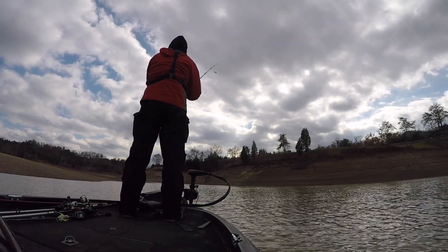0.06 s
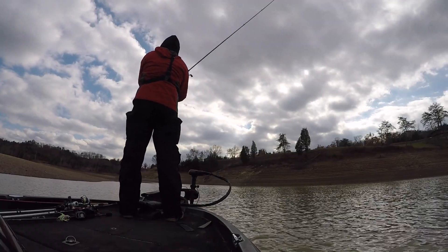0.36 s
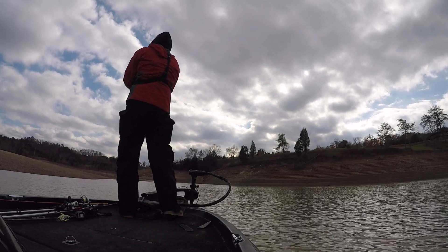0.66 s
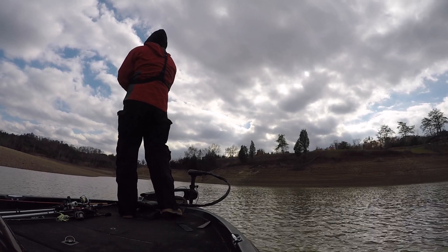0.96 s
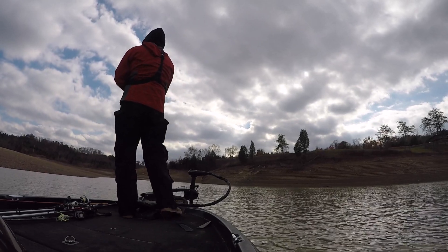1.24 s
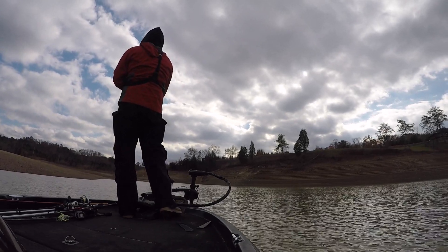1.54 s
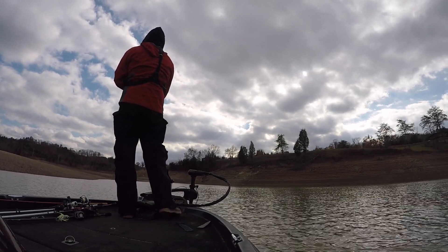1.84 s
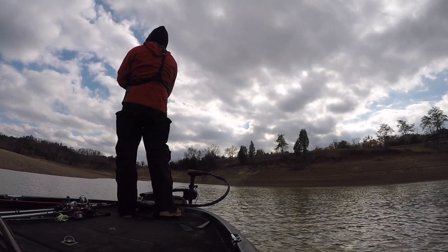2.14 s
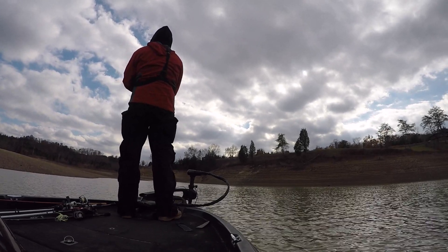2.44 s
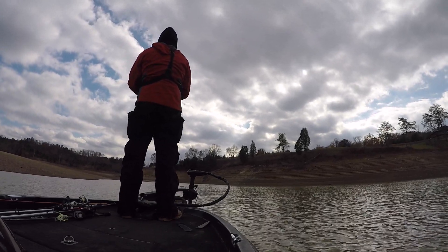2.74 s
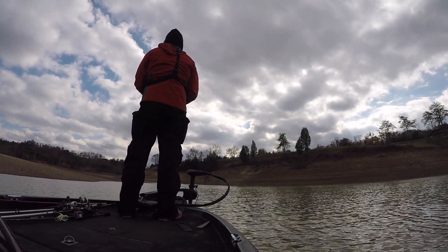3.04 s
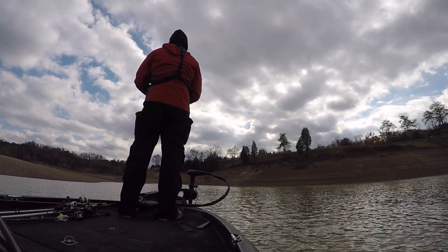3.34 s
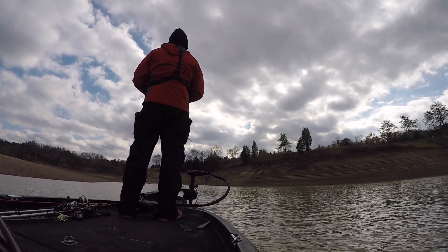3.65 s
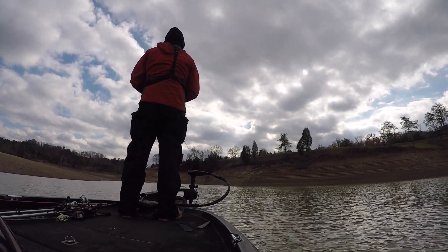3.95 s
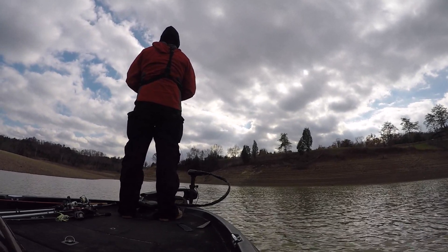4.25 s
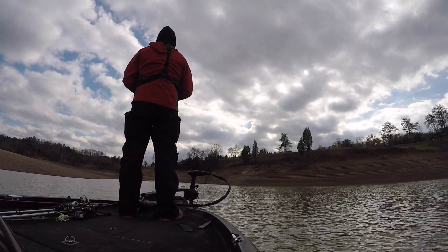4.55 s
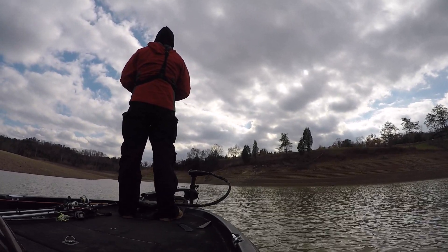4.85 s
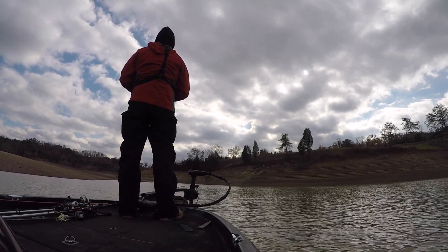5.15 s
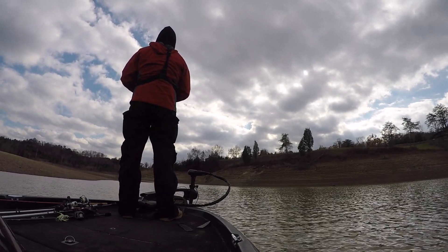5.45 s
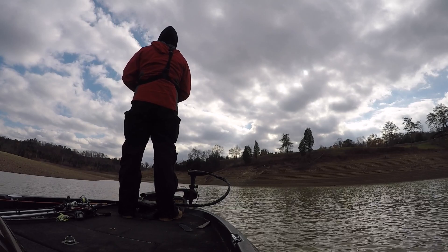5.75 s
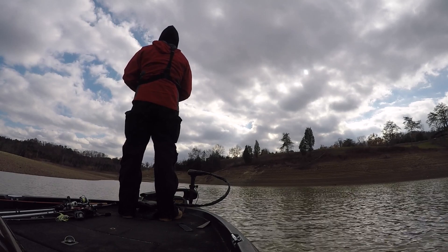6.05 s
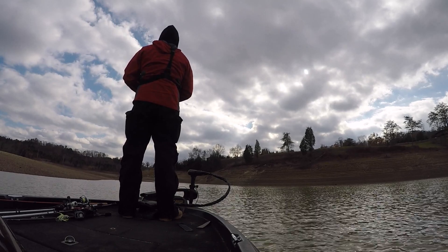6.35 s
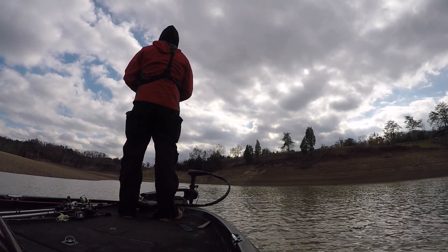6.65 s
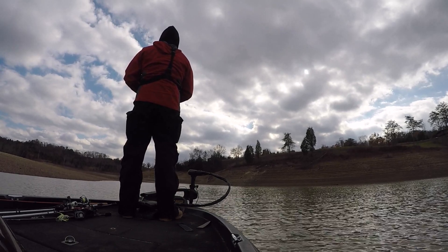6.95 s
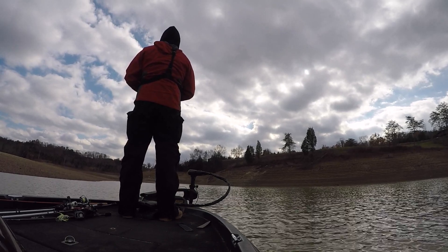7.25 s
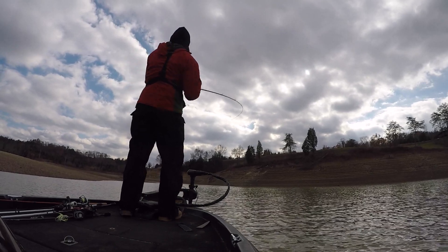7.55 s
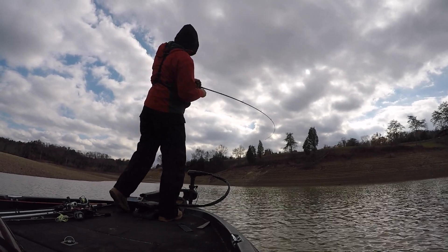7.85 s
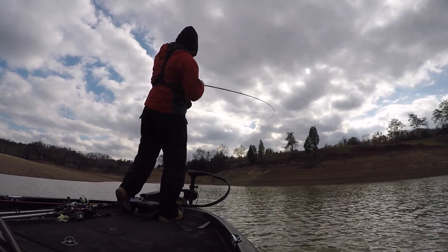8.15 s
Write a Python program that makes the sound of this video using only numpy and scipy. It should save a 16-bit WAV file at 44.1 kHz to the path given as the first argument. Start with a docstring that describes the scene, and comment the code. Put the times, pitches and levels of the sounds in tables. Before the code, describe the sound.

Small waves slosh and knock against a fishing boat creeping across a lake, over a low rumble and the hum of an electric trolling motor. A reel whirrs faintly in a cast, then tackle ticks now and then, once with a sharp click. The motor grows louder toward the end, when a jacket rustles, the rod clicks and a foot thuds. The microphone sits on deck and sounds close and boxy.

```python
"""Bass boat on a lake, from the deck.

The camera sits on deck in a waterproof case, two microphones behind its ports. The electric trolling
motor hums through the hull as the boat creeps along; ripples wash, gurgle and slap at the bow.
Close by, an angler casts: line sings in the guides, the spool whirrs, tackle ticks and rings.
Near the end his jacket swishes as he sweeps the rod back, and a foot thumps."""
import sys
import numpy as np
from scipy import signal
from scipy.fft import rfft, irfft, next_fast_len
from scipy.io import wavfile

SR = 44100
rng = np.random.default_rng(int(sys.argv[2]) if len(sys.argv) > 2 else 0)


def log_audio(samples):
    """Write samples as a 16-bit WAV file to the path given in sys.argv[1]."""
    # one column per channel
    frames = np.atleast_2d(samples).T
    # limit to full scale, then quantise
    limited = np.clip(frames, -1, 1)
    pcm = np.round(limited * 32767).astype(np.int16)
    wavfile.write(sys.argv[1], SR, pcm)


N = 370686
TIME = np.arange(N) / SR
FFT_SIZE = next_fast_len(N + SR // 10, True)
BINS = np.maximum(np.fft.rfftfreq(FFT_SIZE, 1 / SR), 1)

# Propeller speed. Each row: time in seconds, blade passes per second.
BLADE_RATE = [(0, 77.8), (1.4, 78.3), (2.3, 77.9), (3.2, 77.5), (4.8, 77.0), (6.5, 76.3), (7.3, 75.9),
              (7.7, 75.6), (8.41, 75.9)]
# Thrust through the hull, and the propeller's higher purr. Each row: time in seconds, level in dB.
THRUST_LEVEL = [(0, -56), (0.6, -58), (1.2, -52), (1.42, -41), (1.8, -43), (2.25, -38.5), (2.9, -45),
                (3.6, -52), (4.3, -55.5), (4.8, -49), (5.5, -48.5), (6.9, -45), (7.3, -48), (7.6, -37.5),
                (8.41, -36)]
PURR_LEVEL = [(0, -56), (1.2, -55), (2.5, -53), (3.3, -50.5), (4.8, -48), (6.0, -48), (7.0, -48.5),
              (7.5, -54), (8.41, -55)]
# Their partials. Each row: multiple of the blade rate, gain in dB, share of the level's swing.
THRUST_ORDERS = [(1, -15.5, 0.26), (2, -8.5, 0.6), (3, -1, 0.95)]
PURR_ORDERS = [(4, -3.5, 0.1), (5, -1, 0.5), (6, -0.5, 1), (7, -10, 0.5), (9, -9, 0.8)]
# The deck droning under the camera. Each row: time in seconds, pitch in Hz, level in dB.
DECK_DRONE = [(0, 103.5, -52.5), (2, 103.5, -58), (3.8, 103.8, -59.5), (4.6, 104.1, -57.5),
              (5.5, 103.7, -48), (6.0, 103.4, -42), (6.8, 103.1, -43.5), (7.35, 104, -47),
              (7.7, 103.7, -41), (8.41, 103.4, -41.5)]
# Its partials. Each row: multiple of half that pitch, gain in dB, share of the level's swing.
DRONE_ORDERS = [(1.13, -16.5, 0.61), (2.003, -1.5, 0.92), (2.78, -12, 0.9), (3, -3.5, 0.88)]
# Propeller churn and hull rumble. Each row: frequency in Hz, relative level in dB.
CHURN_SPECTRUM = [(50, -35), (100, -2), (160, 3.5), (205, 2.5), (258, -3), (335, 2.5), (480, -7),
                  (800, -56)]
RUMBLE_SPECTRUM = [(20, -21), (35, -6), (55, 2), (90, 6.5), (160, 8.5), (215, 4.5), (258, 2), (335, 1),
                   (480, 0), (800, -82)]
# Hull rumble, and ripples along the bow. Each row: time in seconds, level in dB.
RUMBLE_LEVEL = [(0, -33.5), (0.2, -40.5), (0.52, -47), (0.72, -37.5), (1.2, -39.5), (2.05, -44.5),
                (2.55, -39), (3.05, -44.5), (4.7, -44), (5.6, -42.5), (5.9, -40), (6.6, -37.5),
                (7.25, -40.5), (7.65, -35), (8.41, -43.5)]
RIPPLE_LEVEL = [(0, -42.5), (0.55, -49.5), (1.2, -41), (2.45, -41), (3.1, -38.5), (4.0, -38.5),
                (4.6, -39.5), (5.35, -45), (6.1, -40.5), (7.1, -41.5), (8.41, -48.5)]
# Larger waves. Each row: crest and length in seconds, then wash, gurgle and splash levels in dB.
WAVES = [(0.01, 0.068, -27.5, -41.5, -55.5), (0.157, 0.13, -32.5, -33.5, -57.5),
         (0.296, 0.094, -34, -48.5, -62), (0.99, 0.55, -51, -50.5, -64.5), (1.334, 0.085, -41, -41, -60),
         (1.525, 0.21, -36.5, -54.5, -65), (1.885, 0.12, -35.5, -61, -70), (2.147, 0.21, -34.5, -48, -72),
         (2.487, 0.27, -53.5, -51.5, -63.5), (2.908, 0.17, -40, -60, -63), (3.614, 0.16, -34, -57, -82),
         (3.773, 0.14, -36, -40.5, -85), (4.816, 0.46, -40.5, -55, -70.5), (5.067, 0.2, -52.5, -63, -72),
         (5.797, 0.1, -47, -50.5, -80), (6.427, 0.24, -41, -52, -64.5), (6.836, 0.32, -39.5, -52, -67.5),
         (7.237, 0.29, -43, -49, -75), (7.685, 0.21, -35, -47.5, -56.5), (7.966, 0.77, -45.5, -55, -63.5)]
# Air between bow and water rings higher as it closes. Each row: time in seconds, pitch in Hz.
POCKET_PITCH = [(0.0, 584), (0.3, 596), (0.44, 491), (2.15, 572), (2.25, 484), (3.3, 563), (4.14, 531),
                (5.22, 562), (5.27, 491), (5.85, 549), (6.09, 479), (6.51, 568), (6.76, 492), (7.21, 543),
                (7.33, 635), (7.4, 509), (7.82, 599), (8.41, 469)]
# Hull and case resonances stirred by water. Each row: frequency in Hz, width in Hz, gain in dB.
WASH_MODES = [(405, 62, -3.5), (482.4, 61, -2), (570.4, 33.6, 1), (659.5, 100, -1), (700.4, 30, -3)]
GURGLE_MODES = [(795, 199, 5), (995, 77, 7), (1040, 150, -0.5)]
SPLASH_MODES = [(1166, 140, 6), (1503, 190, 3), (1650, 93, 5.5), (1796, 380, -4)]
# Wavelets slapping the hull, and one low foot thump near the end. Each row: start in seconds,
# relative peak in dB, pitch in Hz, t60 in seconds, rise in seconds, fall as a share of the pitch.
HULL_BLOWS = [(0.0005, -15, 600, 0.025, 0.002, 0.12), (0.021, -21, 575, 0.029, 0.003, 0.082),
              (0.034, -21, 598, 0.05, 0.002, 0.14), (0.056, -21.5, 622, 0.04, 0.0018, 0.069),
              (0.072, -28, 970, 0.03, 0.0013, 0), (0.105, -26, 1005, 0.039, 0.002, 0),
              (0.137, -21.5, 658, 0.086, .006, 0), (0.183, -27, 918, 0.028, 0.0037, 0),
              (0.205, -27, 856, 0.05, 0.0024, 0), (0.286, -28, 671, 0.13, .0015, 0),
              (0.324, -26.5, 670, 0.035, 0.0012, 0.097), (1.038, -23, 878, 0.033, 0.002, 0.0047),
              (1.412, -23.5, 573, 0.091, 0.0012, 0.021), (1.468, -21, 602, 0.017, .0015, 0),
              (1.523, -27, 535, 0.059, 0.0024, 0), (1.855, -22.5, 592, 0.22, .004, 0.061),
              (1.966, -22.5, 610, 0.036, 0.0016, 0), (2.044, -25, 646, 0.059, 0.0022, 0.17),
              (2.104, -28, 607, 0.034, 0.0023, 0.47), (2.152, -18.5, 700, 0.017, 0.0024, 0.039),
              (2.208, -26.5, 510, 0.016, 0.0017, 0.35), (2.817, -26, 563, 0.091, 0.0022, 0.055),
              (2.898, -24.5, 582, 0.069, 0.003, 0.1), (3.016, -30.5, 556, 0.03, 0.0015, 0.12),
              (3.076, -27, 571, 0.041, 0.0016, 0.23), (3.141, -28.5, 555, 0.043, 0.0014, 0.16),
              (3.584, -23, 580, 0.08, .007, .05), (3.632, -20.5, 579, 0.087, 0.0011, 0.1),
              (3.689, -21, 592, 0.09, 0.003, 0.039), (3.709, -20.5, 628, 0.02, 0.002, 0.048),
              (4.53, -26, 564, 0.065, 0.0036, 0.12), (5.158, -23.5, 672, 0.019, 0.0013, 0),
              (5.460, -22.5, 885, 0.033, 0.0036, 0.18), (5.476, -36, 915, 0.051, 0.004, 0),
              (5.511, -18.5, 554, 0.029, 0.003, 0.54), (5.520, -21.5, 434, 0.015, 0.0046, 0),
              (5.885, -24.5, 783, 0.03, 0.0012, 0.0022), (6.351, -22, 565, 0.14, 0.0065, 0),
              (7.176, -32.5, 618, 0.02, 0.0016, 0.18), (7.293, -12.5, 618, 0.015, 0.0052, 0.22),
              (7.757, -11, 607.5, 0.068, 0.0026, 0.05), (7.861, -22, 674, 0.07, 0.0048, 0),
              (7.868, -23.5, 325, 0.022, .004, 0.041)]
# The first wave arrives from the right. Each row: time in seconds, left channel gain in dB.
BOW_LEFT_GAIN = [(0, -11), (0.33, -6.5), (0.5, -1)]
# Microphone hiss. Each row: time in seconds, level in dB.
HISS_LEVEL = [(0, -73.5), (0.55, -76.5), (0.68, -70.5), (2.0, -76), (2.45, -73.5), (3.4, -76), (3.8, -78.5),
              (5.0, -77.5), (5.65, -73.5), (5.95, -70.5), (6.45, -68), (7.0, -74), (7.4, -71),
              (7.65, -63.5), (8.41, -66.5)]
# Its colour, and the left side's further tilt. Each row: frequency in Hz, gain in dB.
HISS_SPECTRUM = [(800, -3), (2500, 0), (4200, -1.5), (6200, -1), (7400, 1), (8600, .5), (10000, -1.5),
                 (11200, -9), (12600, -9.5), (14000, -17)]
HISS_LEFT_TILT = [(2500, 5.5), (4500, -1.5), (6500, -5.5), (8000, -9), (13000, -21.5)]
# Line in the guides: cast, squeak, back sweep. Each row: time in seconds, pitch in Hz, level in dB.
CAST_LINE = [(0.6, 4930, -90), (0.635, 5400, -73), (0.675, 6200, -77), (0.71, 6750, -79), (0.76, 7000, -90)]
SQUEAK_LINE = [(3.173, 3540, -70), (3.178, 3270, -63), (3.186, 2790, -51), (3.195, 2670, -66),
               (3.23, 2660, -82)]
SWEEP_LINE = [(7.56, 5030, -75), (7.597, 5460, -59), (7.62, 5060, -57), (7.69, 4700, -69),
              (7.748, 6400, -54.5), (7.772, 4470, -65), (7.84, 3910, -73)]
# The spool spins up, then coasts. Each row: start of the hold and its length in seconds, level in dB.
SPOOL_SPIN = [(0.645, 0.033, -61.5)]
SPOOL_COAST = [(0.73, 0.42, -80.5)]
# Resonances of the spinning spool, coasting spool, sharp clicks and taut line in the guides.
# Each row: frequency in Hz, width in Hz, gain in dB.
SPIN_MODES = [(3170, 220, 3), (4500, 150, -3), (4780, 130, 3), (6300, 900, -13)]
COAST_MODES = [(3300, 700, -6), (4830, 300, -4)]
CLICK_MODES = [(1770, 490, 2), (3140, 350, 3.5), (3750, 510, 4), (5100, 930, -2.5), (6860, 140, 12),
               (9400, 390, -22), (12000, 1500, -17)]
RASP_MODES = [(3480, 210, -2), (3920, 250, -10), (4430, 210, -7.5), (6500, 870, -31)]
# Small tackle pinging, and hollow knocks about the boat. Each row: start in seconds,
# relative peak in dB, pitch in Hz, t60 in seconds, relative peak of the shared ring in dB.
PINGS = [(0.646, -56, 3230, 0.04, -85), (0.677, -59, 4580, 0.035, -85), (0.765, -51, 2400, 0.014, -78),
         (0.7955, -66, 10250, 0.035, -82), (1.697, -55.5, 2230, 0.026, -81),
         (2.143, -40.5, 2250, 0.011, -61), (2.167, -42, 4880, 0.014, -62), (2.905, -77, 3200, 0.029, -65),
         (3.726, -38, 3160, 0.012, -43), (4.818, -61, 2310, 0.065, -83), (5.161, -67, 4580, 0.037, -77),
         (5.868, -50.5, 2220, 0.049, -84), (7.022, -64, 5420, 0.038, -78), (7.863, -49, 2820, 0.063, -48),
         (7.863, -55.5, 10100, 0.045, -78), (7.864, -51, 6530, 0.071, -70), (7.967, -52, 3910, 0.081, -60)]
KNOCKS = [(1.039, -26.5, 1003, 0.036, -59), (1.304, -35, 1615, 0.032, -43), (1.342, -45, 1650, 0.035, -56),
          (1.3955, -29, 1375, 0.025, -36.5), (1.403, -33, 1454, 0.018, -36), (1.415, -39, 1410, 0.017, -51),
          (2.151, -32.5, 1207, 0.01, -44), (2.96, -49, 1450, 0.047, -60), (3.726, -35.5, 1120, 0.03, -34.5),
          (5.157, -41, 1396, 0.04, -44), (5.168, -45, 1470, 0.031, -47.5), (5.458, -37, 1175, 0.038, -59),
          (6.352, -22, 1265, 0.059, -35), (6.359, -29.5, 1192, 0.027, -39), (7.637, -46, 1430, 0.038, -56),
          (7.728, -47, 1305, 0.073, -41)]
# Sharp clicks: reel and rod snaps, and the bright edges of hull knocks.
# Each row: start in seconds, peak in dB, low and high edge in Hz, t60 in seconds.
CLICKS = [(0.764, -29, 1240, 2690, 0.0074), (1.398, -57, 1500, 2950, 0.005),
          (1.396, -58, 4500, 10000, .006), (1.698, -62, 1900, 3140, 0.011), (2.15, -48, 1590, 4600, 0.025),
          (2.1658, -39.5, 3070, 6050, 0.008), (2.173, -52, 4400, 5400, 0.0084),
          (3.7253, -20.5, 1600, 7990, 0.012), (7.523, -41, 1180, 1920, 0.012),
          (7.542, -47, 1210, 2180, 0.014), (7.632, -43, 1200, 5200, 0.03), (7.642, -39, 1200, 4400, 0.023),
          (7.664, -43, 1200, 4200, 0.025), (7.71, -31.5, 1000, 2270, 0.029), (7.731, -38, 1200, 2140, .025),
          (7.849, -47, 1000, 2700, 0.01), (7.86, -52, 2500, 10100, .03)]
# Trickles off the bow. Each row: middle and half length in seconds, pitch in Hz, level in dB.
TRICKLES = [(1.367, 0.048, 1740, -60), (2.996, 0.035, 1610, -65.5), (4.104, 0.043, 1620, -70.5),
            (4.38, 0.065, 1094, -60), (4.66, 0.046, 1650, -66.5), (4.86, 0.05, 1160, -56.5),
            (5.053, 0.04, 1180, -58), (5.08, 0.088, 1780, -69.5), (5.808, 0.073, 1290, -63),
            (6.857, 0.042, 1770, -64), (7.258, 0.06, 1750, -67)]
# The level dips briefly after two sharp slaps. Each row: start in seconds, nominal depth in dB.
DIPS = [(5.522, 10.5), (7.302, 9.5)]
# The jacket sweeps, the line comes taut. Each row: start and length of the hold in seconds, level in dB.
JACKET_STROKES = [(7.635, 0.13, -47.5)]
TAUT_STROKES = [(7.754, 0.02, -49.5)]
# Rubbing jacket cloth. Each row: frequency in Hz, relative level in dB.
CLOTH_SPECTRUM = [(1000, 15.5), (1700, 7), (2400, -0.5), (3100, -2.5), (3550, 3), (4300, -3), (5100, -6),
                  (5800, -24.5), (6700, -9), (8100, -38), (9200, -22.5), (13000, -45)]
# Balance of the case's two ports. Each row: frequency in Hz, left minus right in dB.
PORT_BALANCE = [(100, -5.5), (200, -6.5), (370, -10), (480, -13.5), (600, -18.5), (720, -14), (850, -5.5),
                (1200, -1), (2300, 0), (4200, .5), (7000, -1.5), (10000, -4)]
# Phase between the ports. Each row: frequency in Hz, lead of the left in radians.
PORT_PHASE = [(300, 0), (490, 2.4), (620, 0), (820, 1.94), (1500, 1.82), (2200, 1.85), (3000, 0.8),
              (5000, -1.5), (9000, -1.2)]


def from_db(db):
    """Decibels to gain."""
    return 10 ** (np.asarray(db) / 20)


def rms_one(x):
    """Scale to unit rms."""
    return x / np.sqrt(np.mean(x ** 2) + 1e-20)


def in_time(rows):
    """Each column of a curve at every sample."""
    s, *columns = np.transpose(rows)
    return [np.interp(TIME, s, column) for column in columns]


def over_hz(points):
    """A curve at every frequency bin."""
    hz, value = np.transpose(points)
    return np.interp(np.log(BINS), np.log(hz), value)


def phase_of(hz):
    """Running phase of a moving pitch, in radians."""
    return 2 * np.pi * np.cumsum(hz) / SR


def drift(rate_hz):
    """Random wander of unit rms, mostly slower than the rate."""
    size = N // 64
    hz = np.arange(size // 2 + 1) * SR / N
    spectrum = rfft(rng.standard_normal(size)) / (1 + (hz / rate_hz) ** 2) * (hz > 1)
    return np.interp(np.linspace(0, size - 1, N), np.arange(size), rms_one(irfft(spectrum, size)))


def butter(x, order, edges_hz, kind):
    """Butterworth filter."""
    return signal.sosfilt(signal.butter(order, edges_hz, kind, fs=SR, output="sos"), x)


def equalise(x, curve):
    """Filter by a curve of dB over Hz."""
    return irfft(rfft(x, FFT_SIZE) * from_db(over_hz(curve)), FFT_SIZE)[:N]


def coloured_noise(spectrum):
    """Steady noise of unit rms with this spectrum."""
    return rms_one(equalise(rng.standard_normal(N), spectrum))


def resonate(x, hz, width_hz):
    """One resonance with unit gain at its peak."""
    r = np.exp(-np.pi * width_hz / SR)
    feedback = [1, -2 * r * np.cos(2 * np.pi * hz / SR), r * r]
    return signal.lfilter(np.array([1, 0, -1]) * (1 - r * r) / 2, feedback, x + 1e-18)


def body(x, modes, low_hz, high_hz, order=5):
    """Parallel resonances radiating between two edges, at unit rms."""
    rings = sum((-1) ** k * from_db(db) * resonate(x, hz, width)
                for k, (hz, width, db) in enumerate(modes))
    return rms_one(butter(rings, order, [low_hz, high_hz], "band"))


def grains(per_s, spread_db, clump_db):
    """Random little impulses of uneven size, swelling in clumps."""
    sizes = from_db(spread_db * np.minimum(rng.exponential(1, N), 4)) * rng.choice([-1, 1], N)
    return sizes * (rng.random(N) < per_s / SR) * from_db(clump_db * drift(15))


def strokes(rows, attack_s, release_s):
    """Gain that rises, holds and falls; attack and release are the times for 20 dB."""
    gain = np.zeros(N)
    for s, hold_s, db in rows:
        before, after = np.maximum(s - TIME, 0), np.maximum(TIME - s - hold_s, 0)
        gain += from_db(db - 20 * (before / attack_s + after / release_s))
    return gain


def add(out, s, sound, peak_db):
    """Place a sound at a time with a given peak."""
    at = round(s * SR)
    out[at:at + len(sound)] += (from_db(peak_db) * sound / np.abs(sound).max())[:N - at]


def blows(rows, thud_db, thud_t60, tail_db, tail_t60, width_share, gain_db):
    """Each blow swells into one mode whose pitch sags; neighbouring modes add a thud and a faint tail."""
    out, t = np.zeros(N), TIME[:SR // 4]
    for s, db, hz, t60, rise_s, sag in rows:
        pitch_hz = hz * (1 + sag * (np.exp(-t / 0.011) - .5))
        tone = np.sin(phase_of(pitch_hz)) * from_db(-60 * t / t60)
        attack = 1 - np.exp(-(t / rise_s) ** 3)
        neighbours = rms_one(resonate(rng.standard_normal(len(t)), hz, width_share * hz))
        decay = from_db(thud_db - 60 * t / thud_t60) + from_db(tail_db - 60 * t / tail_t60)
        neighbours *= np.abs(tone * attack).max() * decay
        add(out, s, butter((tone + neighbours) * attack, 3, [0.44 * hz, 1.23 * hz], "band"), db + gain_db)
    return out


def with_ring(rows, ring_hz, t60_ratio, rise_s, sag):
    """Pair each blow's own mode with a ring they all share; a damped blow damps both."""
    modes = []
    for s, db, hz, t60, ring_db in rows:
        modes += [(s, db, hz, t60, rise_s, sag), (s, ring_db, ring_hz, t60_ratio * t60, rise_s, sag)]
    return modes


def hum(base_hz, level_db, orders, waver, flutter_db):
    """Orders of a rotation, each fluttering in the uneven flow and following the load by its own share."""
    turn = phase_of(base_hz * (1 + waver * drift(13)))
    out, mean_db = np.zeros(N), level_db.mean()
    for multiple, db, share in orders:
        order_db = mean_db + share * (level_db - mean_db) + db + flutter_db * drift(2.6)
        out += np.sqrt(2) * from_db(order_db) * np.sin(multiple * turn + rng.uniform(0, 2 * np.pi))
    return out


def trolling_motor():
    """Through the hull: the propeller hums, purrs and churns harder with thrust; the deck drones."""
    blade_hz, = in_time(BLADE_RATE)
    thrust_db, = in_time(THRUST_LEVEL)
    purr_db, = in_time(PURR_LEVEL)
    drone_hz, drone_db = in_time(DECK_DRONE)
    propeller = hum(blade_hz, thrust_db, THRUST_ORDERS, waver=.001, flutter_db=1.2)
    purr = hum(blade_hz, purr_db, PURR_ORDERS, waver=.002, flutter_db=2.2)
    churn_db = -49.5 + 0.87 * (thrust_db - thrust_db.mean())
    churn = from_db(churn_db) * coloured_noise(CHURN_SPECTRUM)
    drone = hum(drone_hz / 2, drone_db, DRONE_ORDERS, waver=0.0057, flutter_db=2.0)
    return propeller + purr + churn + drone


def hull_rumble():
    """The hull booms low as it pushes through the water."""
    level_db, = in_time(RUMBLE_LEVEL)
    return from_db(level_db) * coloured_noise(RUMBLE_SPECTRUM)


def wave_gains(gurgle_db=-57, splash_db=-71, rise_share=0.47):
    """Gains of wash, gurgle and splash: running ripples, plus a bell-shaped swell for each wave."""
    ripple_db, = in_time(RIPPLE_LEVEL)
    swing_db = ripple_db - ripple_db.mean()
    power = from_db([ripple_db, gurgle_db + 0.52 * swing_db, splash_db + 0.06 * swing_db]) ** 2
    for s, length_s, *levels_db in WAVES:
        width_s = length_s * np.where(TIME < s, rise_share, 1 - rise_share)
        power += np.outer(from_db(levels_db) ** 2, np.exp(-((TIME - s) / width_s) ** 2))
    return np.sqrt(power)


def air_pocket(width_hz=70):
    """Ripples keep the hollow under the bow ringing at its moving pitch."""
    hz, = in_time(POCKET_PITCH)
    ringing = butter(rng.standard_normal((2, N)), 2, width_hz / 2, "low")
    phase = phase_of(hz)
    return rms_one(ringing[0] * np.cos(phase) + ringing[1] * np.sin(phase))


def ripples():
    """Near water, throbbing with the blades, and far-side wash; smaller bubbles ring higher and sparser."""
    blade_hz, = in_time(BLADE_RATE)
    wash_gain, gurgle_gain, splash_gain = wave_gains()
    throb = 1 + 0.16 * np.sin(phase_of(blade_hz))
    near, far = (body(grains(3500, 1.8, 0.7), WASH_MODES, 300, 814) for side in range(2))
    wash = wash_gain * rms_one(throb * (near + from_db(-2) * air_pocket()))
    gurgle = gurgle_gain * body(throb * grains(2000, 1.5, 1.9), GURGLE_MODES, 730, 1147)
    splash = splash_gain * body(grains(1000, 1.2, 2.5), SPLASH_MODES, 1180, 2200)
    return wash + gurgle + splash, wash_gain * far


def hull_blows():
    """Wavelets slap the hull and a foot thumps once near the end, each a short tone in a broad thud."""
    return blows(HULL_BLOWS, thud_db=-17, thud_t60=0.14, tail_db=-16, tail_t60=0.18,
                 width_share=0.43, gain_db=-1.5)


def microphone_hiss():
    """Each microphone hisses on its own, the right one brighter."""
    level_db, = in_time(HISS_LEVEL)
    left, right = (coloured_noise(HISS_SPECTRUM) for side in range(2))
    return from_db(level_db) * np.array([equalise(left, HISS_LEFT_TILT), right])


def singing_line(rows, width_hz, rasp_db=2):
    """Sliding line sings in a rough, narrow band whose pitch follows its speed."""
    hz, level_db = in_time(rows)
    band = butter(rng.standard_normal(N), 2, width_hz / 2, "low")
    rough = rms_one(band * from_db(rasp_db * drift(120)))
    sliding = (TIME > rows[0][0]) & (TIME < rows[-1][0])
    return sliding * from_db(level_db) * rough * np.sqrt(2) * np.sin(phase_of(hz))


def spool(attack_s=0.062, release_s=0.06):
    """Running line rings the spool in the cast; it coasts on with a thin whirr."""
    spin = body(grains(3000, 2.9, 3.9), SPIN_MODES, 2500, 7000)
    coast = body(grains(3000, 1.5, 1.5), COAST_MODES, 2800, 6000)
    return (strokes(SPOOL_SPIN, attack_s, release_s) * spin
            + strokes(SPOOL_COAST, attack_s, release_s) * coast)


def tackle_pings():
    """Tackle and line guides ping, each at its own pitch over one bright ring."""
    modes = with_ring(PINGS, ring_hz=6910, t60_ratio=1.05, rise_s=0.00069, sag=0.018)
    return blows(modes, thud_db=-7, thud_t60=0.05, tail_db=-21, tail_t60=0.19,
                 width_share=.075, gain_db=2.5)


def sharp_clicks(rise_s=0.0005, tail_t60=0.1, tail_db=-24):
    """Reel and rod snaps and the bright edges of hull knocks: a short crack rings high resonances."""
    out, t = np.zeros(N), TIME[:SR // 5]
    for s, db, low_hz, high_hz, crack_t60 in CLICKS:
        decay = from_db(-60 * t / crack_t60) + from_db(tail_db - 60 * t / tail_t60)
        force = decay * (1 - np.exp(-t / rise_s)) * rng.standard_normal(len(t))
        add(out, s, body(force, CLICK_MODES, low_hz, high_hz, order=3), db)
    return out


def boat_knocks():
    """Plips and knocks about the boat share one hollow ring."""
    modes = with_ring(KNOCKS, ring_hz=1650, t60_ratio=1.25, rise_s=0.0022, sag=0.042)
    return blows(modes, thud_db=-9.5, thud_t60=0.012, tail_db=-10, tail_t60=0.14,
                 width_share=0.065, gain_db=1)


def trickles(width_hz=250):
    """Short runs of small bubbles swell and fade off the bow, each ringing in a narrow band."""
    out = np.zeros(N)
    bubbles = grains(900, 1.5, 1.7)
    for s, half_s, hz, db in TRICKLES:
        run = np.abs(TIME - s) < .3
        ringing = resonate(resonate(bubbles[run], hz, width_hz), hz, width_hz)
        swell = np.exp(-.5 * ((TIME[run] - s) / half_s) ** 2)
        out[run] += from_db(db) * swell * rms_one(ringing)
    return out


def level_dips(attack_s=0.0046, recovery_s=0.11):
    """Gain that drops quickly and creeps back."""
    gain_db = np.zeros(N)
    for s, depth_db in DIPS:
        age = np.maximum(TIME - s, 0)
        gain_db -= depth_db * (1 - np.exp(-age / attack_s)) * np.exp(-age / recovery_s)
    return from_db(gain_db)


def rod_sweep():
    """Stick and slip as the rod goes back: the jacket rustles broadly, taut line rasps in the guides."""
    line_grip, cloth_grip = (from_db(2.2 * drift(110)) * grains(4000, 1.3, .7) for surface in range(2))
    cloth = rms_one(butter(equalise(cloth_grip, CLOTH_SPECTRUM), 3, 1000, "high"))
    rasp = body(line_grip, RASP_MODES, 2700, 7200)
    return (strokes(JACKET_STROKES, attack_s=0.11, release_s=0.045) * cloth
            + strokes(TAUT_STROKES, attack_s=0.12, release_s=0.077) * rasp)


def camera_case(pressure):
    """One pressure reaches both ports; the right one booms with the case and lags in the midrange."""
    left_over_right = from_db(over_hz(PORT_BALANCE)) * np.exp(1j * over_hz(PORT_PHASE))
    right = 2 * rfft(pressure, FFT_SIZE) / (1 + left_over_right)
    return irfft(np.array([left_over_right * right, right]), FFT_SIZE)[:, :N]


def scene():
    """Water, motor and angler in stereo from inside the case on deck, over the hiss."""
    thuds = hull_blows()
    clatter = boat_knocks() + tackle_pings() + sharp_clicks()
    near_water, far_water = ripples()
    dip = level_dips()
    left_db, = in_time(BOW_LEFT_GAIN)
    bow = camera_case(dip * (near_water + trickles()) + thuds)
    bow[0] *= from_db(left_db)
    bow[0] += from_db(-15.5) * dip * far_water  # the hull's far side reaches only the left port
    boat = trolling_motor() + hull_rumble()
    angler = spool() + rod_sweep() + singing_line(CAST_LINE, width_hz=240)
    angler += singing_line(SQUEAK_LINE, width_hz=560) + singing_line(SWEEP_LINE, width_hz=980)
    return bow + camera_case(dip * boat + clatter + angler) + dip * microphone_hiss()


def record(dry):
    """The top is cut steeply above 13.2 kHz."""
    return signal.sosfilt(signal.ellip(10, .2, 80, 13200, fs=SR, output="sos"), dry)


dry = scene()
out = record(dry)
log_audio(out)
```